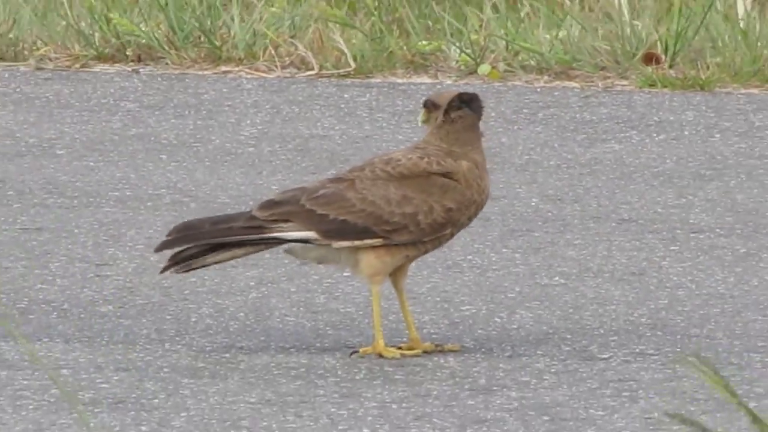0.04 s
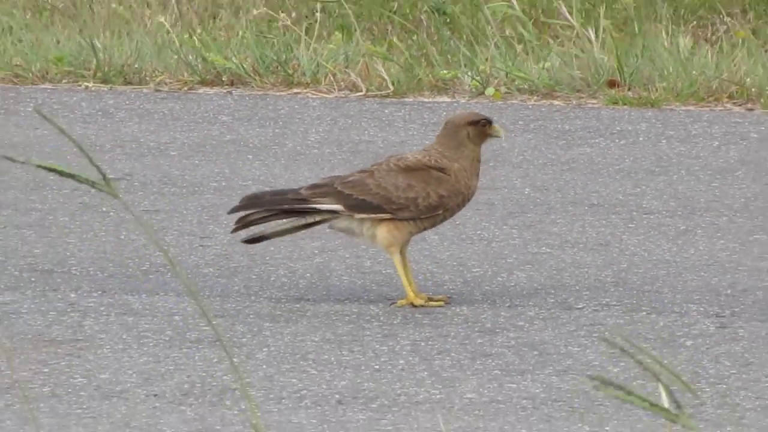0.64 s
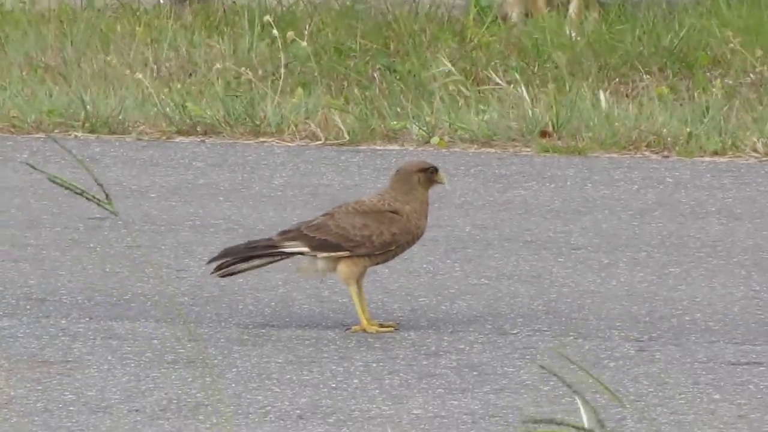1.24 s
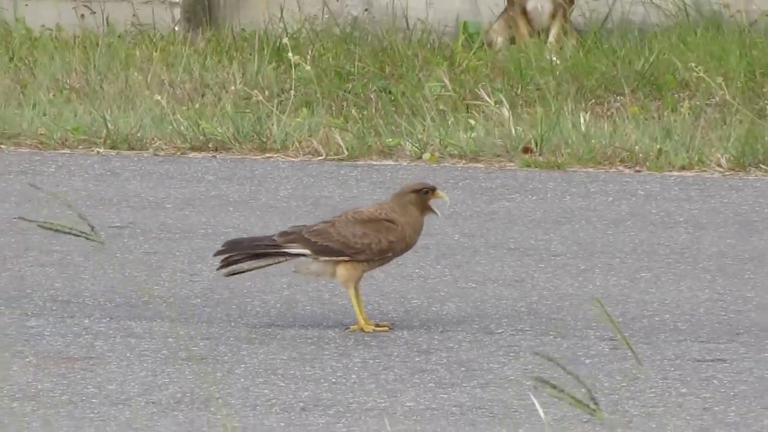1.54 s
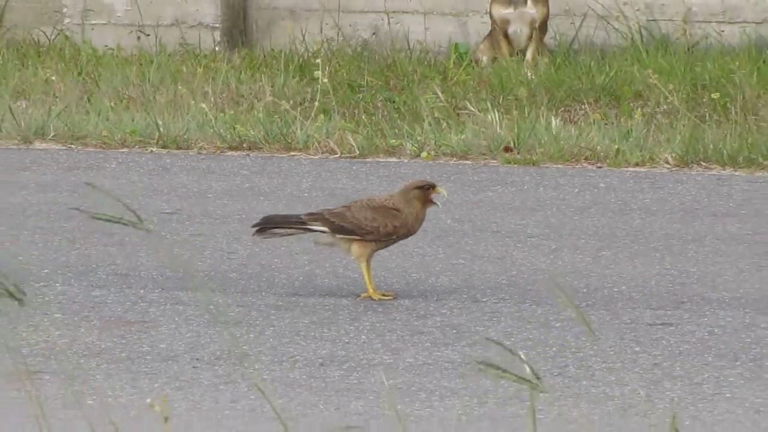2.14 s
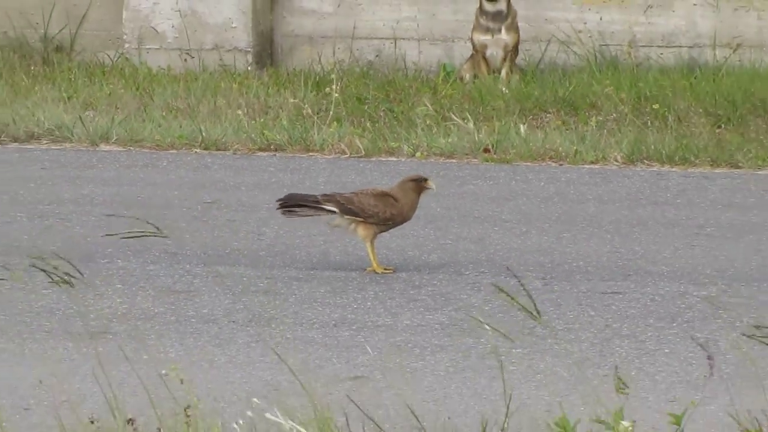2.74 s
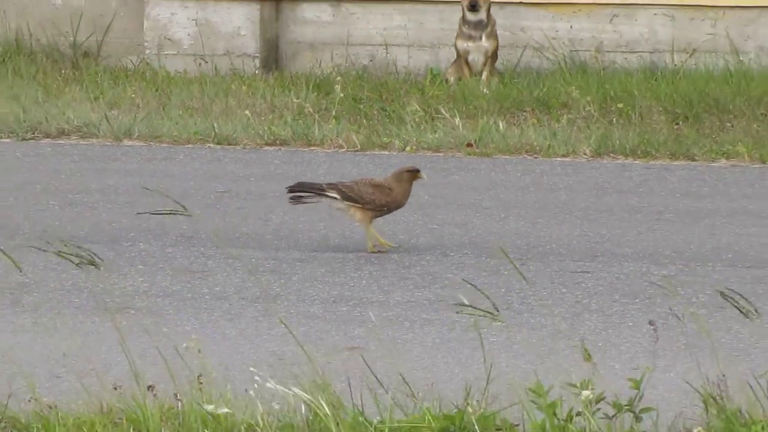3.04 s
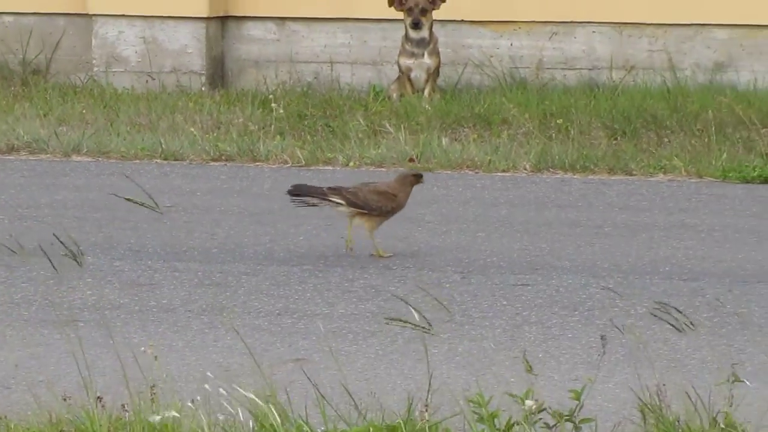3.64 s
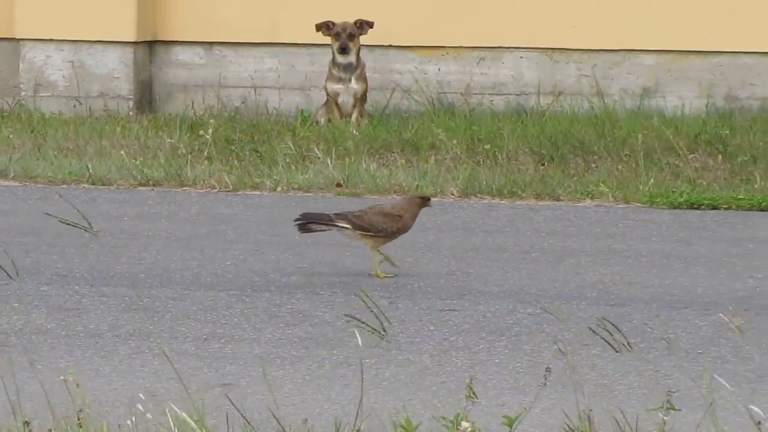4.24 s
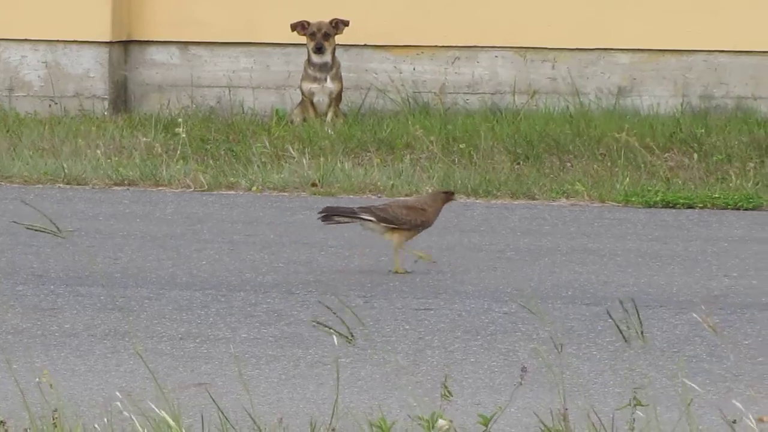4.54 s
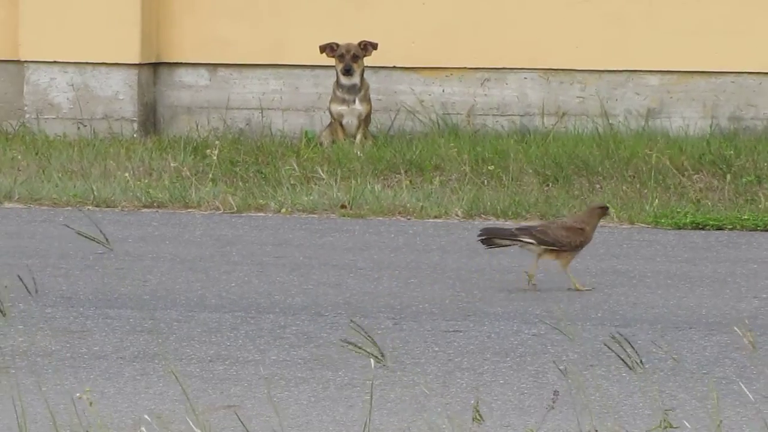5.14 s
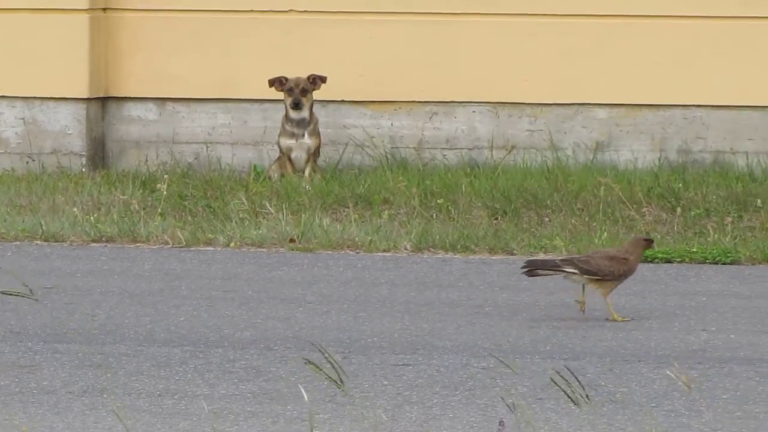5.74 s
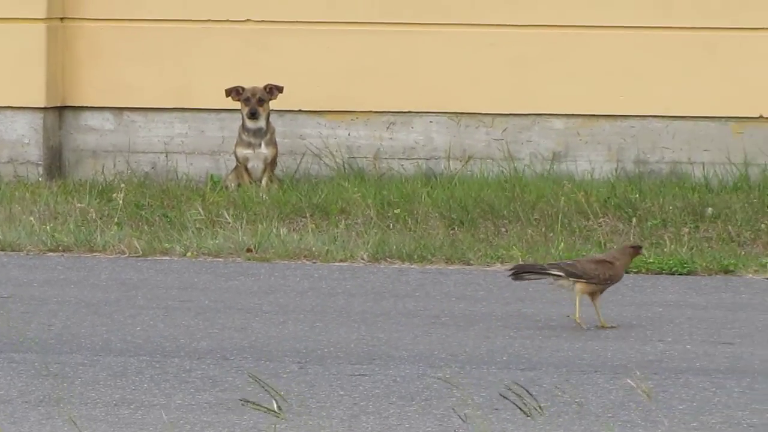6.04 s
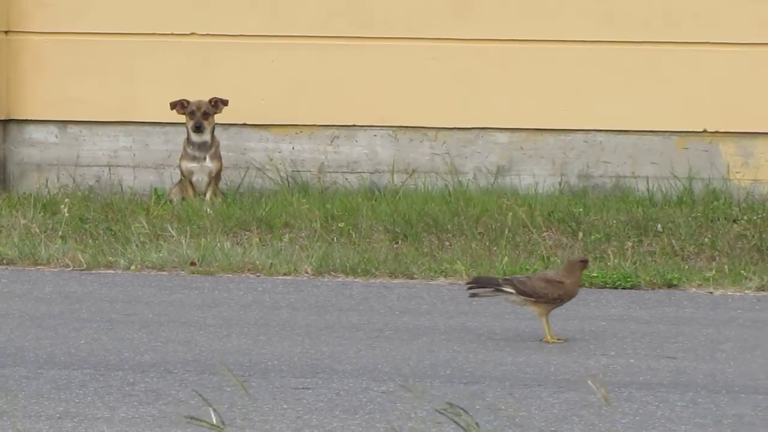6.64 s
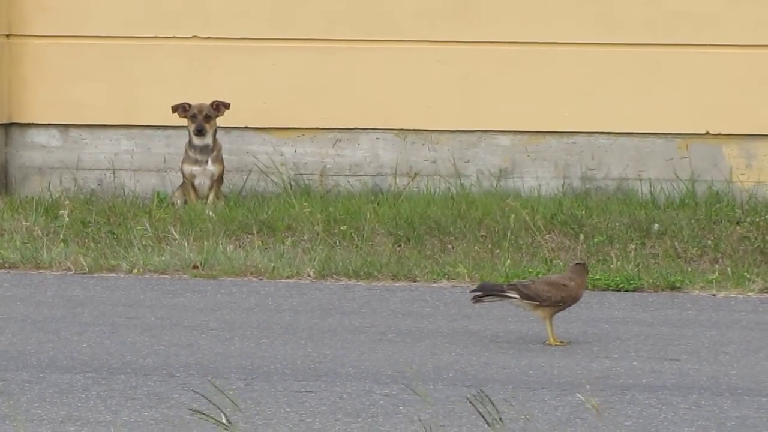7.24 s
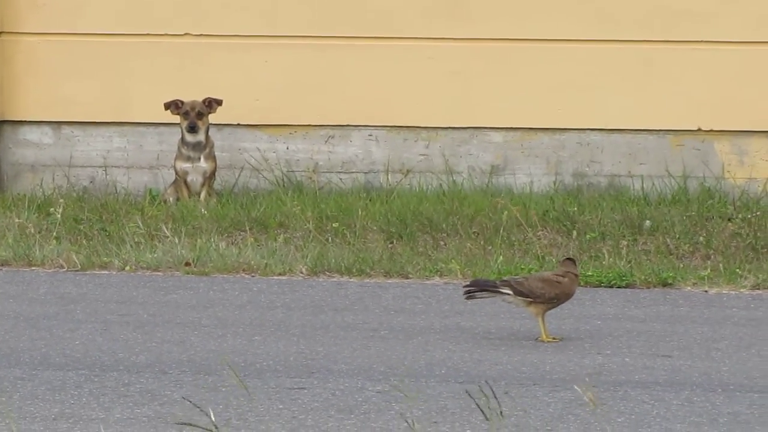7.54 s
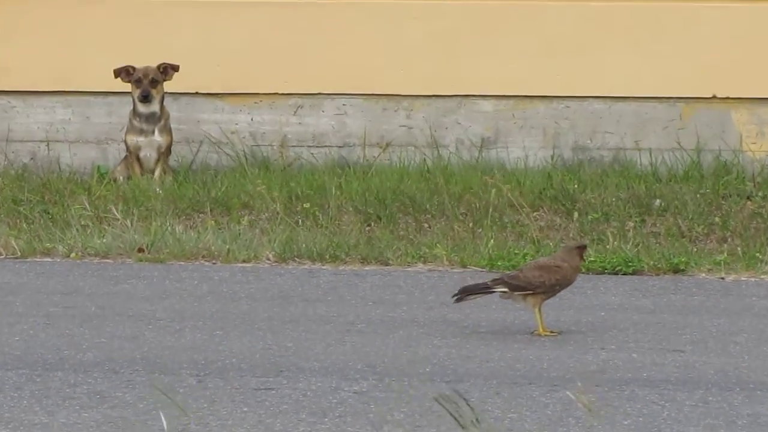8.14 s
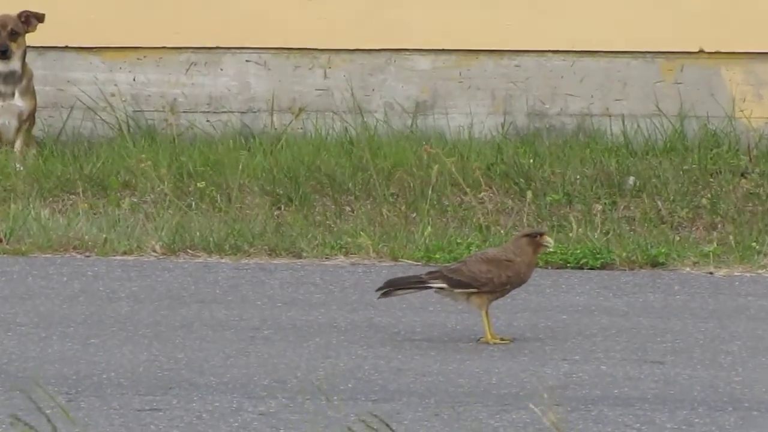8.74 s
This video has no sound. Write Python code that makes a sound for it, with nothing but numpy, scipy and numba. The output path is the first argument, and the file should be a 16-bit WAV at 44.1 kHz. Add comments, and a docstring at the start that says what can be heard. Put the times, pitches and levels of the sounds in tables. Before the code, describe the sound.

Two shrill, hoarse screeches from a large bird slide downward against distant traffic hiss, with faint chirps and a sharp knock on the microphone.

```python
"""Caracara on a quiet road

A caracara gives two long falling screeches that a garden wall throws back. Its syrinx, sounding through
throat and beak, starts hoarse, clears to a whistle, drops, breaks into a rasp and slides away.
Small birds chirp far off, wind brushes the microphone, and traffic and foliage make an even hiss.
Taps ring the camera body; the sharpest pushes the gain down."""
import sys
import numpy as np
from scipy import signal
from scipy.fft import rfft, irfft, next_fast_len
from scipy.io import wavfile
from scipy.ndimage import uniform_filter1d
from numba import njit

SR = 44100
rng = np.random.default_rng(int(sys.argv[2]) if len(sys.argv) > 2 else 0)


def materialize(psi):
    """Save the field psi as 16-bit PCM at rate SR to the path in sys.argv[1].

    A 1-D psi becomes a single channel; in a 2-D psi each row is a channel.
    """
    bounded = np.clip(np.atleast_2d(psi).T, -1, 1)
    quanta = np.round(bounded * 32767).astype(np.int16)
    wavfile.write(sys.argv[1], SR, quanta)


N = 387638


def undb(db):
    """Decibels to gain."""
    return 10 ** (np.asarray(db) / 20)


def unit(x):
    """Scale to rms 1."""
    return x / np.sqrt(np.mean(x ** 2))


def steady(x, window=1300):
    """Hold the level at rms 1 but keep the quick flutter."""
    return x / np.sqrt(uniform_filter1d(x ** 2, window) + 1e-12)


def colour(x, points, db_scale=1):
    """Filter by a spectrum of (Hz, dB) points."""
    hz, db = np.transpose(points)
    size = next_fast_len(x.shape[-1])
    f = np.maximum(np.fft.rfftfreq(size, 1 / SR), 1)
    gain = undb(db_scale * np.interp(np.log(f), np.log(hz), db))
    return irfft(rfft(x, size) * gain, size)[..., :x.shape[-1]]


def wander(size, hz):
    """Random motion of rms 1, up to about hz."""
    padded = next_fast_len(size)
    f = np.fft.rfftfreq(padded, 1 / SR)
    spectrum = rfft(rng.standard_normal(size), padded) / (1 + (f / hz) ** 2)
    return unit(irfft(spectrum, padded)[:size])


@njit
def resonate(x, hz, width_hz):
    """Band-pass with a moving centre, gain 1 there."""
    y, band, low = np.empty(len(x)), 0., 0.
    for i in range(len(x)):
        g, damping = np.tan(np.pi * hz[i] / SR), width_hz / hz[i]
        v = (band + g * (x[i] - low)) / (1 + g * (g + damping))
        band, low, y[i] = 2 * v - band, low + 2 * g * v, damping * v
    return y


def staged(t, values, changes, fade_s=0.012):
    """Hold each value in turn, with smooth steps at the times of change."""
    out = values[0]
    for value, s in zip(values[1:], changes):
        step = .5 + .5 * np.tanh((t - s) / (2 * fade_s))
        out = out + (value - out) * step
    return out


def add(out, s, x):
    """Mix x into out from time s on."""
    i = int(s * SR)
    out[:, i:i + x.shape[-1]] += x[..., :N - i]


def place(x, pan_db):
    """Pan by left minus right dB."""
    return np.array([x * undb(pan_db / 2), x * undb(-pan_db / 2)])


def lag(x, lag_s):
    """Off-axis sound reaches the left microphone port after the right."""
    size = next_fast_len(N + 100)
    delay = np.exp(-2j * np.pi * np.fft.rfftfreq(size, 1 / SR) * lag_s)
    return np.array([irfft(rfft(x[0], size) * delay, size)[:N], x[1]])


def street(x, scatter_db, wall_s=0.034, wall_db=-16, scatter_t60_s=0.87):
    """A distant source, its wall echo and diffuse scatter from road and grass."""
    out = lag([x, x], lag_s=12e-6)
    add(out, wall_s, undb(wall_db) * x)
    t = np.arange(SR // 2) / SR
    scatter = unit(rng.standard_normal((2, len(t))) * undb(-60 * t / scatter_t60_s)) / np.sqrt(len(t))
    return out + undb(scatter_db) * signal.fftconvolve(scatter, x[None], axes=1)[:, :N]


# Hiss spectrum. Each row: frequency in Hz, relative level in dB.
AIR_SPECTRUM = [(15, -19), (25, -3), (99, -6), (209, -3), (267, -3.5), (469, -5), (648, -5), (804, -3.5),
                (895, -4), (2490, -16), (2770, -13), (3930, -21.5), (4500, -22), (15500, -42.5)]
# Stereo width. Each row: frequency in Hz, side minus mid in dB.
AIR_WIDTH = [(60, -10), (110, -13.5), (200, -19.5), (380, -12.5), (700, -11), (1290, -4), (2380, -2.5),
             (4400, -1.5), (8120, 2.5), (15000, 0)]
# Balance. Each row: frequency in Hz, leftward bias in dB before scaling per channel.
AIR_BALANCE = [(60, -1), (110, 0), (200, -0.5), (380, 1), (700, -1.5), (1290, -1), (2380, -7.5),
               (4400, 0.5), (8120, 0), (15000, 2)]


def air(level_db=-43.5, swell_db=-0.55):
    """Distant traffic and foliage: a slightly swelling hiss, widest in the treble."""
    mid, side = colour(rng.standard_normal((2, N)), AIR_SPECTRUM)
    side = colour(side, AIR_WIDTH)
    stereo = np.array([colour(mid + side, AIR_BALANCE, 0.35), colour(mid - side, AIR_BALANCE, -0.52)])
    return stereo / mid.std() * undb(level_db + swell_db * wander(N, 7.8))


# Wind puffs. Each row: centre in seconds, Gaussian width in seconds, level in dB.
WIND_PUFFS = [(0.288, 0.025, -44), (1.617, 0.0097, -26.5), (1.706, 0.04, -24), (2.11, 0.096, -39),
              (8.222, 0.016, -20), (8.442, 0.037, -29), (8.53, 0.033, -27.5)]
# Rumble spectrum. Each row: frequency in Hz, relative level in dB.
WIND_SPECTRUM = [(20, -12), (55, -4.5), (80, 1), (150, -1.5), (260, -9.5), (450, -23), (1000, -50),
                 (3000, -80)]


def wind(pan_db=3):
    """Eddies thump each microphone port separately."""
    t = np.arange(N) / SR
    force = sum(undb(db) * np.exp(-((t - s) / width_s) ** 2 / 2) for s, width_s, db in WIND_PUFFS)
    return place(force, pan_db) * unit(colour(rng.standard_normal((2, N)), WIND_SPECTRUM))


def whistle(length_s, start_hz, end_hz, arch=0, waver=0.012):
    """A short bird note that bends downward ever faster."""
    u = np.linspace(0, 1, int(length_s * SR))
    glide_hz = start_hz + (end_hz - start_hz) * u ** 1.33
    hz = glide_hz * (1 + arch * np.sin(np.pi * u) + waver * wander(len(u), 220))
    return unit(np.sin(np.pi * u) * np.sin(2 * np.pi * np.cumsum(hz) / SR))


# Single chirps. Each row: start in seconds, starting pitch in Hz, level in dB.
LONE_CHIRPS = [(.53, 3500, -57), (1.18, 5150, -56.5), (1.455, 4750, -59), (4.42, 5150, -56.5),
               (4.475, 5050, -58), (4.85, 4400, -56.5), (4.865, 3300, -54.5), (5.15, 3380, -53),
               (5.155, 4450, -59), (5.42, 4400, -62)]
# Notes of the phrase. Each row: offset and length in seconds, start and end in Hz, relative level in dB.
PHRASE_NOTES = [(0, .03, 8450, 6470, -2), (0.066, .022, 5800, 5080, 0.5), (.094, .026, 5450, 5300, -3),
                (.176, .032, 5900, 4600, -1)]
# Repeats of the phrase. Each row: start in seconds, level in dB.
PHRASE_REPEATS = [(3.015, -61), (3.301, -50.5), (3.591, -50)]


def small_birds(chirp_s=.06, chirp_fall=0.072):
    """One bird repeats a four-note phrase; others chirp now and then."""
    out = np.zeros((1, N))
    for s, db in PHRASE_REPEATS:
        for offset_s, length_s, start_hz, end_hz, note_db in PHRASE_NOTES:
            add(out, s + offset_s, undb(db + note_db) * whistle(length_s, start_hz, end_hz))
    for s, hz, db in LONE_CHIRPS:
        add(out, s, undb(db) * whistle(chirp_s, hz, hz * (1 - chirp_fall), arch=0.0395))
    return street(out[0], scatter_db=-6.5)


# Taps. Each row: start in seconds, peak before panning in dB, centre in Hz, left minus right in dB.
CAMERA_TAPS = [(0.822, -24.5, 1600, 3), (0.928, -23, 2600, 4), (2.779, -30.5, 2300, -4.5),
               (3.008, -14, 3430, -15), (3.0105, -2, 2000, -12), (3.153, -23, 3000, -4),
               (3.281, -26, 895, -2), (7.761, -24.5, 450, -5)]
# Camera body modes. Each row: frequency in Hz, relative level in dB, T60 in seconds.
BODY_MODES = [(658, -16.5, 0.041), (1130, -12, 0.047), (1600, -15, 0.01), (2020, -3.5, 0.0091),
              (2970, 3.5, 0.0055), (3260, -1.5, 0.0093), (4560, -1, 0.0095), (8300, 5, 0.0077),
              (10260, -62, .003)]


def camera_taps(spread_octaves=0.54, rattle_db=-24, rattle_t60_s=0.03):
    """Each tap rings the modes near its pitch, with a brief rattle; so small a body radiates no bass."""
    out, t = np.zeros((2, N)), np.arange(SR // 10) / SR
    radiation = signal.butter(3, [450, 8500], "band", fs=SR, output="sos")
    for s, peak_db, tap_hz, pan_db in CAMERA_TAPS:
        ring = 0
        for hz, db, t60_s in BODY_MODES:
            detune = np.log2(hz / tap_hz) / spread_octaves
            ring += undb(db - 60 * t / t60_s) * np.sin(2 * np.pi * hz * t) / (1 + detune ** 2)
        noise = resonate(rng.standard_normal(len(t)), np.full(len(t), float(tap_hz)), float(tap_hz))
        rattle = unit(noise) * undb(rattle_db - 60 * t / rattle_t60_s)
        tap = signal.sosfilt(radiation, ring / np.abs(ring).max() + rattle)
        add(out, s, place(undb(peak_db) * tap / np.abs(tap).max(), pan_db))
    return out


def screech_pitch(t, start_s, drop_s, relax_s, drop_fade_s, top_hz=1996, low_hz=1789.5, tail_hz=1840):
    """The pitch scoops into a shallow arch, drops, sags, then flips up and slides away."""
    scoop_hz = 520.6 * np.exp((start_s - t) / .028)
    arch_hz = 1700 * (t - drop_s + .155) ** 2
    low = low_hz - 440 * (t - drop_s)
    tail = tail_hz - 2150 * (t - relax_s) - 4000 * (t - relax_s) ** 2
    notes = staged(t, [top_hz - scoop_hz - arch_hz, low], [drop_s], drop_fade_s)
    return staged(t, [notes, tail], [relax_s], fade_s=0.0029)


def syrinx(t, hz, half_db, rasp, flutter, shake=0.28, hiss_db=-9, waver_db=1.74, ragged_db=0.7, count=22):
    """A membrane whose cycles alternate strong and weak, adding half-pitch lines, and tumble in a rasp."""
    size, half, rasp_share = len(t), undb(half_db), np.minimum(rasp, 1)
    drift = (0.00158 + 0.00262 * half) * wander(size, 54.3)
    phase = 2 * np.pi * np.cumsum(hz * (1 + drift)) / SR
    sway = flutter * np.sin(phase / 6)
    locked = 1 / (1 + np.exp(1 - 4 * wander(size, 90)))  # a purer tone for a few ms at a time
    tumble = rasp * (1 - .7 * locked)
    phase = phase + 0.52 * sway + tumble * wander(size, 183)
    slip = np.cos(2.3 * rasp_share * wander(size, 93))  # the alternation loses its step
    alternation = half * (1 - 0.11 * rasp_share * locked) * slip
    spread_db = (waver_db + ragged_db * half) * (2 - rasp_share)  # a slack membrane wavers more
    waver = [undb(spread_db * wander(size, 12.3)) for _ in range(count)]
    lines = sum(np.cos(k * phase / 2 + k * k) * (alternation if k % 2 else 1) * waver[k]
                for k in range(1, count))
    loudness = (1 + .5 * sway) * np.exp(shake * rasp * wander(size, 210))
    hiss = undb(hiss_db) * tumble * np.sqrt(count) * rng.standard_normal(size)
    return lines * loudness + hiss


# Voice cracks around the break into the rasp. Each entry: time in seconds.
CRACK_TIMES_S = [2.022, 2.06, 2.073, 2.086, 2.097, 8.185, 8.211, 8.232]


def cracking(t, rasping, crack_s=0.003, rattle_hz=125.2, unevenness=.35, depth=.75):
    """How far the voice is broken: single cracks, then an uneven rattle."""
    turns = np.cumsum(rattle_hz * (1 + unevenness * wander(len(t), 59.5))) / SR
    cracks = sum(np.exp(-((t - s) / crack_s) ** 2) for s in CRACK_TIMES_S)
    return cracks + rasping * depth * np.sin(np.pi * turns) ** 4


# Throat and open beak response. Each row: frequency in Hz, gain in dB.
THROAT_RESPONSE = [(400, -12), (800, -10.5), (1250, -12), (1720, -6), (1980, 3.5), (2200, -8.5),
                   (2600, 0.5), (4000, -4), (4600, -3.5), (6000, 3), (7500, -4), (9000, -6), (11000, -12.5),
                   (16000, -35)]
# Hoarse opening, whistle, lower note, rasp, tail. Each row: half-pitch lines in dB, throat resonance
# in Hz, its lift in dB, beak resonance in Hz, its lift in dB, base treble level in dB.
VOICE_STAGES = [(-1, 3600, -4.5, 4970, -5, -3.5), (-32, 3670, 17, 5700, 1, 5),
                (-11.5, 3440, 17.5, 6900, 9, -6.5), (0, 3240, 15.5, 5300, -19, -9),
                (2.5, 2660, 14, 5200, -12, -10.5)]


def screech(call, effort, throat_width_hz=420., beak_width_hz=800., treble_hz=4600,
            beak_shut_db=-23, onset_half_db=-15.5, crack_rasp=0.7, crack_dip_db=-7):
    """The syrinx runs through its stages and sounds through throat and beak; effort sets the level."""
    start_s, clear_s, drop_s, rasp_s, relax_s, end_s = call[:6]
    beak_open_s, drop_fade_s, hoarseness, flutter, treble_db_per_s, extra_lift_db = call[6:]
    t = np.arange(start_s, end_s, 1 / SR)
    halves_db, *tract = np.transpose(VOICE_STAGES)

    strain = staged(t, [0, 1], [start_s + 0.027])  # the first instant is still clean
    crack = cracking(t, staged(t, [0, 1, 0], [rasp_s, relax_s]))
    # half-pitch lines linger into the whistle and return late after the drop
    half_db = staged(t, halves_db, [clear_s + .018, drop_s + 0.043, rasp_s, relax_s], fade_s=.018)
    half_db = (half_db + onset_half_db * (1 - strain)) * (1 - crack)
    rising_rasp = 0.26 + 1.2 * (t - rasp_s)
    rasp = staged(t, [hoarseness * strain, .006, rising_rasp, 0.15], [clear_s, rasp_s, relax_s])
    rasp = np.maximum(rasp, 0) + crack_rasp * crack
    hz = screech_pitch(t, start_s, drop_s, relax_s, drop_fade_s)
    source = syrinx(t, hz, half_db, rasp, staged(t, [flutter * strain, 0], [clear_s]))

    changes = [clear_s, drop_s, rasp_s, relax_s]
    throat_hz, lift_db, beak_hz, beak_db, treble_db = (staged(t, column, changes) for column in tract)
    source = colour(source, THROAT_RESPONSE)
    throat = undb(lift_db + extra_lift_db) * resonate(source, throat_hz, throat_width_hz)
    beak = undb(beak_db) * resonate(source, beak_hz, beak_width_hz)
    voice = source + throat + beak

    core = signal.sosfiltfilt(signal.butter(6, treble_hz, fs=SR, output="sos"), voice)
    shut = np.exp((start_s - t) / beak_open_s)  # treble comes in as the beak opens
    treble = undb(treble_db + treble_db_per_s * (t - drop_s) + beak_shut_db * shut) * steady(voice - core)
    level_db = np.interp(t, *np.transpose(effort))
    edges = np.clip(np.minimum(t - start_s, end_s - t) / 0.0022, 0, 1)
    return (steady(core * undb(crack_dip_db * crack)) + treble) * undb(level_db) * edges


# Screeches. Each row: times of start, clearing, drop, rasp, relaxing and end in seconds, time constants
# of beak opening and drop in seconds, opening hoarseness and flutter 0-1, treble slope in dB per second,
# extra throat lift in dB.
CALLS = [(1.537, 1.739, 1.924, 2.085, 2.412, 2.72, .009, 0.013, 0.32, 0.34, -6, 1),
         (7.657, 7.853, 8.113, 8.215, 8.6, 8.79, 0.038, 0.0022, 0.78, 0.1, 4.5, -0.5)]
# Force of the call, one list per screech. Each row: time in seconds, relative level in dB.
CALL_EFFORT = [
    [(1.545, -38), (1.625, -32), (1.861, -25.5), (1.913, -24.5), (1.957, -17.5), (2.077, -18),
     (2.149, -22.5), (2.201, -18.5), (2.323, -25), (2.395, -24), (2.665, -40.5), (2.72, -60)],
    [(7.665, -35), (7.895, -30.5), (7.961, -26), (7.983, -31), (8.079, -28), (8.097, -34.5), (8.119, -22.5),
     (8.151, -20), (8.407, -24.5), (8.501, -20), (8.713, -34.5), (8.785, -32)],
]


def caracara(gain_db=0.3):
    """Both screeches, heard across the street."""
    out = np.zeros((1, N))
    for call, effort in zip(CALLS, CALL_EFFORT):
        add(out, call[0], undb(gain_db) * screech(call, effort))
    return ports(*street(out[0], scatter_db=-13.5))


# Caracara's balance. Each row: frequency in Hz, leftward bias in dB before scaling per channel.
CALL_BALANCE = [(1800, -4), (2550, -5), (2950, -3), (3350, 2), (3900, -1), (6000, -1), (10000, 1)]


def ports(left, right):
    """The two microphone ports share the voice unevenly across frequency."""
    return np.array([colour(left, CALL_BALANCE, 0.57), colour(right, CALL_BALANCE, -0.46)])


def scene():
    """Everything that reaches the microphone."""
    return caracara() + small_birds() + lag(camera_taps(), lag_s=90e-6) + wind() + lag(air(), lag_s=40e-6)


def record(dry, threshold_db=-6, squeeze=0.23, peak_decay_db_per_s=0.54, attack_s=0.0097, top_hz=15750):
    """Gain control ducks after a loud peak and creeps back; overloads clip and the top is cut."""
    decay_db = peak_decay_db_per_s * np.arange(N) / SR
    peak_db = 20 * np.log10(np.abs(dry).max(axis=0) + 1e-9)
    held_db = np.maximum.accumulate(peak_db + decay_db) - decay_db
    step = 1 / (attack_s * SR)
    duck_db = signal.lfilter([step], [1, step - 1], squeeze * np.maximum(held_db - threshold_db, 0))
    lowpass = signal.ellip(10, .2, 80, top_hz, fs=SR, output="sos")
    return signal.sosfilt(lowpass, np.clip(dry * undb(-duck_db), -1, 1))


dry = scene()
out = record(dry)
materialize(out)
```